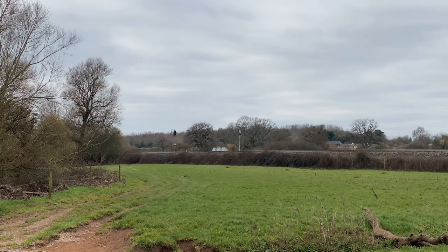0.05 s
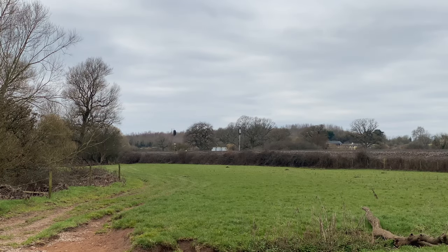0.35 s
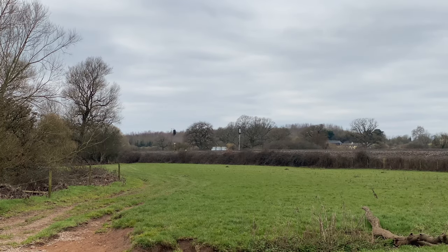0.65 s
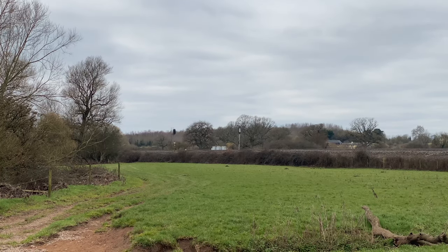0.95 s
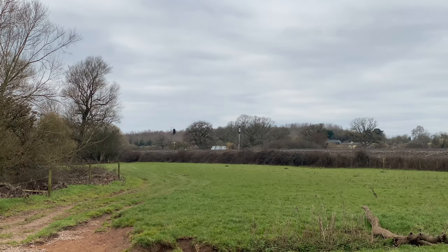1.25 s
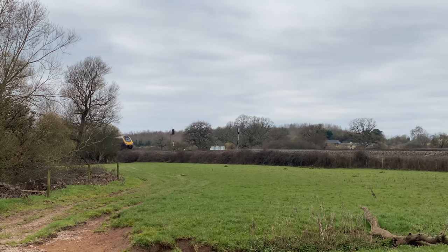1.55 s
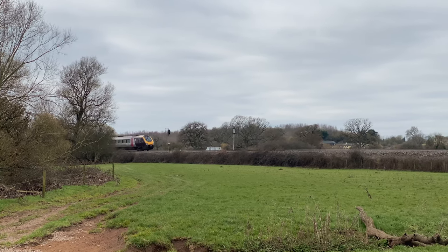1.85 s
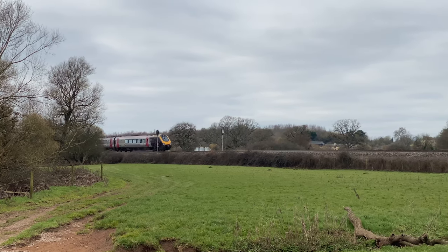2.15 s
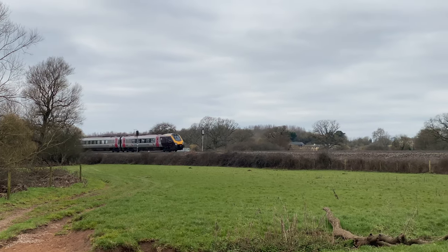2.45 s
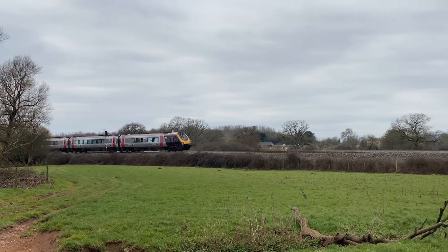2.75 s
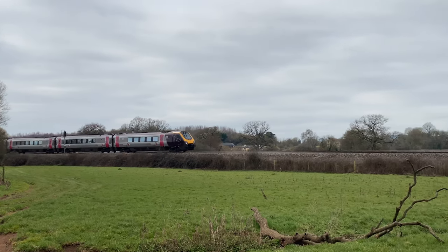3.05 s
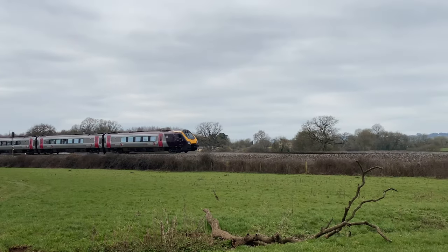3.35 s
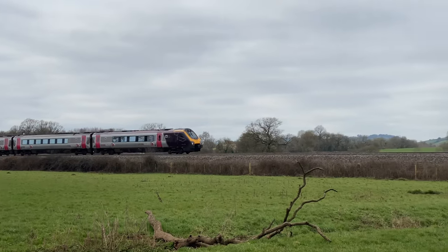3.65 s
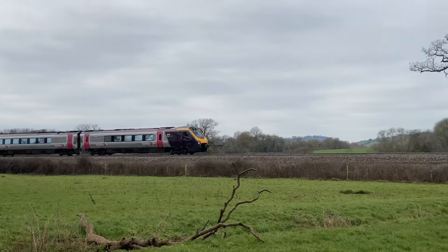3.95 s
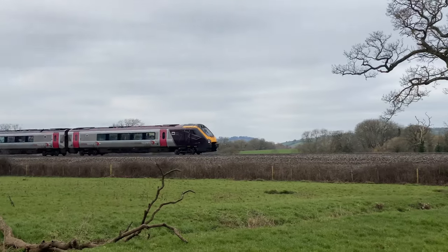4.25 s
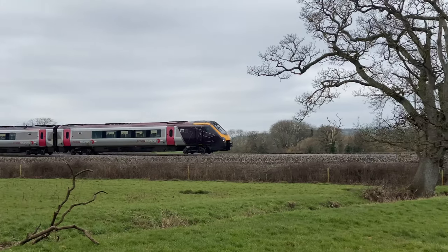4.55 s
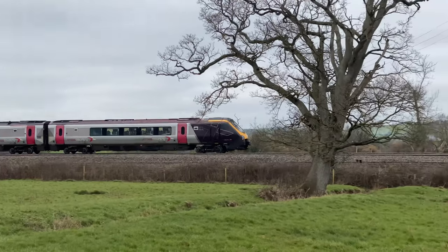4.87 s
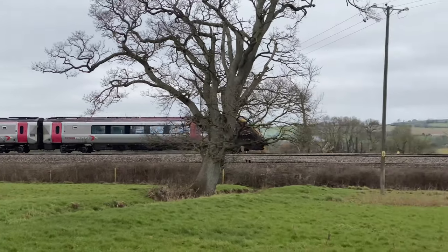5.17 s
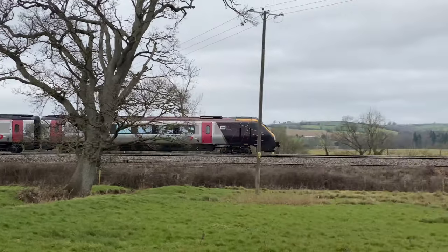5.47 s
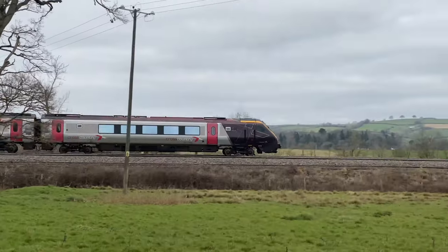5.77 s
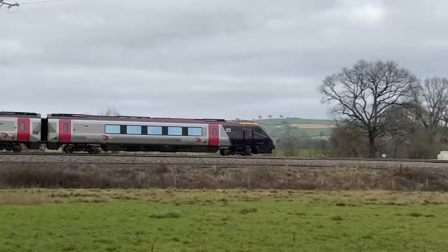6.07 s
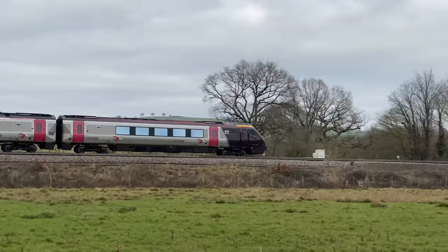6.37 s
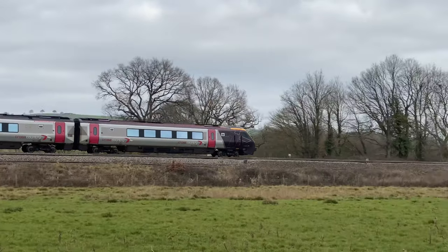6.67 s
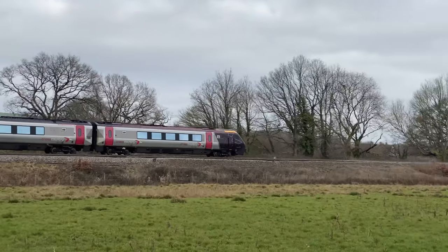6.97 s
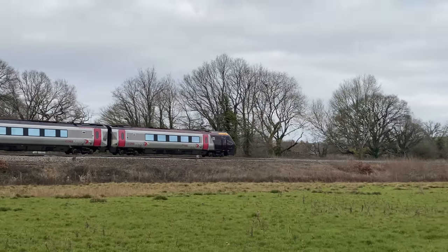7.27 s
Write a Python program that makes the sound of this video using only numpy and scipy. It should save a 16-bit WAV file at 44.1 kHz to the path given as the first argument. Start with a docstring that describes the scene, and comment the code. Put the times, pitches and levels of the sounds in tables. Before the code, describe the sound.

In an open field, a faint, distant track roar and light puffs of wind give way to a fast diesel train. Its low engine drone grows, then the cars rumble by with roaring, ringing rails, brief bright wheel scrapes and hiss that surges in an even beat. Thin whines sink in pitch as the cars pass. Wind buffets and thumps the microphone, hardest as the front of the train draws level.

```python
"""A fast diesel train comes out from behind trees and passes across a field.
Its exhausts drone, and rough wheels make the cars rumble and the rails roar, ring and hiss.
The hiss surges with each pair of bogies, and the running gear's whines sink in pitch as the cars go by.
Wind buffets, flaps and thumps on the microphone, hardest while the front of the train draws level."""
import sys
import numpy as np
from scipy import signal
from scipy.fft import rfft, irfft, next_fast_len
from scipy.io import wavfile
from scipy.ndimage import uniform_filter1d, map_coordinates

SR = 44100
rng = np.random.default_rng(int(sys.argv[2]) if len(sys.argv) > 2 else 0)


def transcribe(signal):
    """Save signal, clipped to [-1, 1], as a 16-bit WAV file at the path in sys.argv[1]."""
    frames = np.atleast_2d(signal).T
    limited = np.clip(frames, -1, 1)
    pcm = np.round(limited * 32767).astype(np.int16)
    wavfile.write(sys.argv[1], SR, pcm)


N = 327222


def amp(db):
    """Decibels to gain."""
    return 10 ** (np.asarray(db) / 20)


def unit(x):
    """Scale to rms 1."""
    return x / np.sqrt(np.mean(x ** 2) + 1e-20)


def clock():
    """The time of every sample, in seconds."""
    return np.arange(N) / SR


def along(points, hz):
    """Read (freq_hz, value) breakpoints on a log frequency axis."""
    freqs, values = np.transpose(points)
    return np.interp(np.log(hz + 1), np.log(freqs + 1), values)


def curves(rows):
    """One automation curve for each column after time_s."""
    times, *columns = np.transpose(rows)
    return [np.interp(clock(), times, column) for column in columns]


def swell(peak_s, spread_s):
    """A bell-shaped rise and fall around a moment."""
    return np.exp(-((clock() - peak_s) / spread_s) ** 2 / 2)


def bursts(rows):
    """The summed envelope of (peak_s, spread_s, level_db) swells."""
    return sum(amp(db) * swell(peak_s, spread_s) for peak_s, spread_s, db, *_ in rows)


def wobble(rate):
    """Smooth random modulation, rate knots a second."""
    knots = rng.standard_normal(4096)
    return map_coordinates(knots, [clock() * rate], mode="wrap")


def filtered(x, response):
    """Filter x by a complex frequency response."""
    size = next_fast_len(N + SR // 2)
    return irfft(rfft(x, size) * response(np.fft.rfftfreq(size, 1 / SR)), size)[..., :N]


def equalised(x, eq):
    """x through an EQ curve that rolls off steeply above its last point."""
    top_hz = eq[-1][0]
    return filtered(x, lambda hz: amp(along(eq, hz)) / np.maximum(hz / top_hz, 1) ** 10)


def rush(eq, side_db, patchy_db):
    """Shaped stereo noise of rms 1, with patches of random gain across time and frequency."""
    spectra = signal.stft(rng.standard_normal((2, N)), nperseg=512)[2]
    patches = uniform_filter1d(rng.standard_normal(spectra.shape[1:]), size=8, axis=0)
    patches = unit(uniform_filter1d(patches, size=10, axis=1))
    noise = signal.istft(spectra * amp(patchy_db * patches), nperseg=512)[1][:, :N]
    mid, side = equalised(noise, eq)
    return unit(np.array([mid + amp(side_db) * side, mid - amp(side_db) * side]))


def doppler(abreast_s, mach=.135, reach_s=1.25):
    """Pitch factor of a pass-by; reach_s is the track's distance over the speed."""
    past_s = clock() - abreast_s
    return 1 / (1 + mach * past_s / np.hypot(past_s, reach_s))


def phase_of(hz):
    """Running phase of a changing frequency."""
    return 2 * np.pi * np.cumsum(hz) / SR


def fuzzy(phase, rate):
    """A narrow noise band of rms 1 around a tone."""
    return unit(wobble(rate) * np.cos(phase) + wobble(rate) * np.sin(phase))


# gusts over the breeze: start_s, length_s, level_db
GUSTS = [(0.815, 0.043, -38), (1.12, 0.068, -33.5), (3.05, 0.12, -36), (3.423, 0.79, -37.5),
         (4.06, 0.23, -28), (4.4, 0.17, -19.5), (4.603, .34, -23.5), (4.956, 0.54, -22), (5.6, 0.35, -30),
         (5.942, 0.43, -27.5), (6.94, 0.56, -31.5)]
# boomy wind EQ: freq_hz, gain_db
BUFFET_EQ = [(18, -31.5), (30, -16.5), (45, -3.5), (60, 4), (85, 1), (130, -5.5), (200, -13.5),
             (300, -26.5), (600, -39.5), (1200, -55), (3000, -90.5)]


def wind_buffet(breeze_db=-39, attack_s=.026, release_s=.073):
    """Eddies rumble on the microphone: a bed of breeze, and gusts that rise, hold and die away."""
    power = amp(breeze_db) ** 2
    for start_s, length_s, db in GUSTS:
        age = clock() - start_s
        gust = np.clip(age / attack_s, 0, 1) * np.exp(-np.maximum(age - length_s, 0) / release_s)
        power += (amp(db) * gust) ** 2
    rumble = amp(1.6 * wobble(28)) * rush(BUFFET_EQ, side_db=-10, patchy_db=-.35)
    return np.sqrt(power) * unit(rumble)


# flaps of wind: peak_s, spread_s, level_db
FLAPS = [(.033, 0.0049, -54), (.108, 0.0046, -52), (.17, 0.0067, -48), (.303, .004, -52), (.362, .006, -52),
         (.58, 0.011, -44), (.985, 0.0048, -40), (1.13, 0.015, -43), (1.195, 0.0055, -38),
         (1.472, 0.0027, -40), (1.865, 0.0047, -43.5), (1.972, 0.0034, -36), (2.66, 0.0089, -41),
         (5.78, 0.0086, -22.5), (5.82, 0.033, -30), (5.873, 0.0054, -20.5), (5.925, 0.023, -29)]
# low-mid flap EQ: freq_hz, gain_db
FLAP_EQ = [(120, -21.5), (270, 0.5), (450, -4.5), (700, -10), (950, -25), (1400, -36), (2500, -63.5)]


def wind_flaps():
    """Small eddies flap on the microphone over a faint, restless flutter."""
    flutter = amp(-59) * unit(amp(7.5 * wobble(90)))
    return (bursts(FLAPS) + flutter) * rush(FLAP_EQ, side_db=-15.5, patchy_db=3)


# wind hits: start_s, strength_db
THUMPS = [(0.158, -28), (.465, -26), (0.827, -27), (1.149, -29), (1.19, -28), (1.968, -28.5), (3.58, -21),
          (4.257, -14), (4.409, -11), (4.52, -16.5), (4.943, -12), (5.152, -8), (5.264, -9.5), (5.444, -7),
          (7.318, -21)]
# dull puff EQ: freq_hz, gain_db
PUFF_EQ = [(20, -21), (50, -13), (90, -4.5), (180, 0.5), (280, -8.5), (500, -26), (900, -40.5), (2000, -60),
           (5000, -100)]


def wind_thumps(push_hz=95, puff_rise_s=.012):
    """A strong eddy hits with one low push of pressure, wrapped in a longer puff of noise."""
    pushes, puffs = np.zeros(N), np.zeros(N)
    for start_s, db in THUMPS:
        age = np.maximum(clock() - start_s, 0)
        pitch_hz = push_hz * np.exp(.25 * rng.standard_normal())
        pushes += amp(db) * swell(start_s + .016, .007) * np.sin(2 * np.pi * pitch_hz * age)
        puffs += amp(db) * age / puff_rise_s * np.exp(1 - age / puff_rise_s)
    return amp(-3) * pushes + amp(-10) * puffs * rush(PUFF_EQ, side_db=-8, patchy_db=1.2)


# exhaust drone automation: time_s, firing_tone_db, overtones_db
DRONE = [(0, -53, -57), (1.3, -43, -53), (2.4, -33, -46), (3.25, -37, -35), (3.75, -34, -34),
         (4.3, -37, -34), (5.15, -23.5, -31.5), (5.7, -32.5, -34.5), (6.5, -40, -35), (6.85, -34.5, -29.5),
         (7.42, -37.5, -31.5)]
# throbs of the firing tone: peak_s, spread_s, level_db
THROBS = [(4.63, 0.075, -27), (7.08, 0.068, -29.5), (7.37, 0.049, -27)]
# balance of crankshaft orders 4 to 9: gain_db
ORDERS_DB = [-13, -5.5, -2, -5, -9.5, -11]


def engines(firing_hz=91):
    """Six-cylinder diesels: a firing tone, and rougher orders from uneven cylinders and several cars."""
    tone_db, overtones_db = curves(DRONE)
    phase = phase_of(firing_hz * doppler(6.95) * (1 + .003 * wobble(7)))
    tone = unit(np.sin(phase) + .35 * fuzzy(phase, rate=30))
    overtones = np.zeros(N)
    for order, db in enumerate(ORDERS_DB, start=4):
        order_phase = phase / 3 * order  # three firings a turn
        partial = np.sin(order_phase + rng.uniform(0, 2 * np.pi))
        overtones += amp(db) * (partial + .7 * fuzzy(order_phase, rate=16))
    return (amp(tone_db) + bursts(THROBS)) * tone + amp(overtones_db) * unit(overtones)


def far_track(tone_hz=4030, pulse_hz=4.5):
    """The far roar of the track, heard before the train is in sight, with a faint pulsing high tone."""
    eq = [(150, -27.5), (300, 0), (550, 5.5), (750, -.5), (1000, -7),
          (1500, -22), (1900, -21.5), (2600, -37), (3500, -44)]
    roar = amp(-57 + 6.7 * swell(2.56, 1)) * rush(eq, side_db=-4, patchy_db=3.5)
    pulse = np.cos(2 * np.pi * pulse_hz * (clock() - .03))
    tone = amp(-96 + 3 * pulse) * fuzzy(phase_of(np.full(N, tone_hz)), rate=45)
    return roar + tone


# rumble automation: time_s, level_db
RUMBLE = [(0, -67), (1.5, -64), (3.2, -38), (4.1, -32), (4.8, -33), (5.55, -26), (6.15, -34.5),
          (6.9, -32.5), (7.42, -35.5)]
# car body EQ: freq_hz, gain_db
CAR_EQ = [(50, -31.5), (110, -4.5), (160, 2.5), (220, -1), (300, -7.5), (400, -9.5), (600, -24.5),
          (1200, -73.5)]


def car_rumble():
    """Rough wheels shake the cars into a low, unsteady rumble."""
    level_db = curves(RUMBLE)[0] + 2 * wobble(25)
    return amp(level_db) * rush(CAR_EQ, side_db=-6, patchy_db=1.5)


# pass-by automation, before each layer's trim: time_s, roar_db, rail_db, hiss_db
PASS_BY = [(0, -70, -73, -98), (1.5, -67.5, -66.5, -90), (2.3, -61, -59.5, -73.5),
           (3.15, -54.5, -52.5, -63), (3.65, -40.5, -41.5, -50), (4.02, -38.5, -33.5, -42),
           (5.0, -35, -29, -38.5), (5.6, -32, -29.5, -40.5), (6.05, -32.5, -29.5, -38.5),
           (6.8, -31.5, -32, -38.5), (7.12, -32.5, -31, -40), (7.42, -32.5, -35.5, -40.5)]
# the top end opens as the train comes close: time_s, fizz_offset_db
FIZZ_OFFSET = [(3.0, -20.5), (3.9, -13), (4.7, -11), (5.35, -4.5)]
# EQs of the rolling layers, dark to bright: freq_hz, gain_db
ROAR_EQ = [(200, -36.5), (330, -8.5), (500, 2.5), (700, 4), (1000, 3), (1350, 3), (1600, -8.5),
           (2300, -34.5)]
RAIL_EQ = [(1000, -19.5), (1450, -5), (1850, 1), (2200, -2.5), (2550, -4.5), (3000, -20), (3800, -45.5)]
WHEEL_RING_EQ = [(1900, -24), (2550, -3), (2850, 2), (3150, 0.5), (3450, -4.5), (3900, -17.5), (4600, -41)]
HISS_EQ = [(2600, -31), (3500, 0), (4200, 3), (5000, -2), (6300, 0), (7200, -9), (8500, -37.5),
           (11000, -49)]
FIZZ_EQ = [(5500, -20), (7200, -4), (7900, 1.5), (9200, -1), (10500, -10), (12000, -19), (12600, -34)]


def wheels_on_rails():
    """Rough wheels ring and shake the sleepers and rails; the treble arrives once the trees are cleared."""
    roar_db, rail_db, hiss_db = curves(PASS_BY)
    hiss_db += hiss_surges()
    fizz_db = hiss_db + curves(FIZZ_OFFSET)[0]
    ring_db = rail_db + .34 * (hiss_db - rail_db)  # distance dims the wheels' ring less than their hiss
    flutter = wobble(22)  # the contact patches bite unevenly
    roar = amp(roar_db + 3.5 + .45 * wobble(16)) * rush(ROAR_EQ, side_db=-20.5, patchy_db=.5)
    rail = amp(rail_db + .35 * flutter) * rush(RAIL_EQ, side_db=-29, patchy_db=1.14)
    ring = amp(ring_db - 2 + .44 * flutter) * rush(WHEEL_RING_EQ, side_db=-23, patchy_db=1.5)
    hiss = amp(hiss_db + .81 * flutter) * rush(HISS_EQ, side_db=-20, patchy_db=1.7)
    fizz = amp(fizz_db + 3 + .99 * flutter) * rush(FIZZ_EQ, side_db=-10.5, patchy_db=1.3)
    return roar + rail + ring + hiss + fizz


# scrape accents: peak_s, spread_s, level_db, hiss_lift_db
SCRAPES = [(3.76, .018, -36, 3), (3.92, .04, -40.5, 1), (4.02, 0.019, -28.5, 2.5), (4.171, .019, -31, 2.5),
           (4.234, 0.013, -23.5, 3), (4.35, 0.022, -29, 7), (4.63, .023, -32, 1), (4.87, 0.033, -42, 2.5),
           (5.075, 0.013, -38, 3), (5.22, 0.02, -39, 1), (5.88, 0.036, -45, 4)]


def scrapes():
    """A wheel scrapes the rail with a short, bright ring."""
    eq = [(1900, -19.5), (2500, -6.5), (2850, -5.5), (3150, -2), (3400, -10.5), (3900, -41)]
    return bursts(SCRAPES) * rush(eq, side_db=-17.5, patchy_db=3.5)


# accent of each pair of bogies in turn: hiss_lift_db
BOGIE_LIFTS = [3.5, 3.2, 4.9, .5, 4.1, 2.1, 4.2, 3.9]


def hiss_surges(first_bogie_s=4.235, car_s=.395, bogie_spread_s=.028):
    """Lift of the hiss in dB: at every scrape, and on an even beat as the bogies at the car ends pass."""
    scraping = sum(db * swell(peak_s, spread_s) for peak_s, spread_s, _, db in SCRAPES)
    bogies = sum(db * swell(first_bogie_s + car * car_s, bogie_spread_s)
                 for car, db in enumerate(BOGIE_LIFTS))
    return scraping + bogies


# running gear whines: rest_pitch_hz, abreast_s, peak_s, spread_s, level_db
WHINES = [(1820, 7.7, 5.14, 0.76, -40), (1857, 6.66, 6.15, 0.36, -32.5), (1850, 6.88, 7.05, 0.2, -34),
          (756, 6.4, 4.7, 0.68, -42), (755, 6.4, 5.84, 0.33, -32.5), (762, 6.5, 6.65, 0.28, -33.5),
          (795, 7.2, 7.3, 0.21, -37), (1147, 6.4, 5.74, 0.3, -38), (1157, 6.8, 6.78, .35, -37.5)]


def gear_whines(sizzle_hz=7800):
    """Each whine swells as its car comes near and sinks in pitch; a thin steel sizzle rides on top."""
    whines = np.zeros(N)
    for rest_pitch_hz, abreast_s, peak_s, spread_s, db in WHINES:
        pitch_hz = rest_pitch_hz * doppler(abreast_s)
        phase = phase_of(pitch_hz * (1 + .001 * wobble(40)))
        roughness = np.interp(pitch_hz, [1300, 1700], [1.3, .3])  # low whines are noisy, high ones sing
        whine = unit(np.sin(phase) + roughness * fuzzy(phase, rate=70))
        whines += amp(db) * swell(peak_s, spread_s) * whine
    sizzle = fuzzy(phase_of(sizzle_hz * doppler(6.7, mach=.04)), rate=300)
    return whines + amp(-49) * swell(6.9, .92) * sizzle


# phase lead of the left microphone port over the right: freq_hz, lead_rad
LEFT_LEAD = [(400, 0.24), (860, 0.82), (1350, 0.62), (1700, 0), (2600, 0), (3100, 0.72), (4950, 0.66),
             (6000, -0.85), (6500, 0.054), (7750, 0.58), (8100, 1.8), (9000, 1.8), (10000, 1.63),
             (10500, -0.16)]


def stereo_image(train):
    """The train reaches the two ports out of step, and its midrange leans left as the cars go by."""
    sides = np.array([[1], [-1]])
    train = filtered(train, lambda hz: np.exp(.5j * sides * along(LEFT_LEAD, hz)))
    mids = equalised(train, [(200, -17), (650, -1), (1150, 1), (1700, 1), (2600, -32)])
    lean = np.interp(clock(), [5.2, 6.2], [0, .15])
    return train + sides * lean * mids


def scene():
    """The mix: wind on the microphone over the approach and pass-by of the train."""
    low_wind = wind_buffet() + wind_thumps()
    width = np.interp(clock(), [2.2, 3.6], [0, 1])  # stronger wind strikes the two ports less alike
    wind = width * low_wind + (1 - width) * low_wind.mean(axis=0) + wind_flaps()
    rolling = car_rumble() + wheels_on_rails() + scrapes() + gear_whines()
    return wind + engines() + far_track() + stereo_image(rolling)


# microphone noise floor EQ: freq_hz, gain_db
SELF_NOISE_EQ = [(2650, -12.5), (4500, -4), (7900, -2.5), (12000, -9)]
SELF_NOISE_DB, TOP_HZ = -91.5, 12450


def record(dry):
    """The microphone adds a faint hiss; a brick-wall low-pass cuts the very top."""
    hiss = amp(SELF_NOISE_DB) * rush(SELF_NOISE_EQ, side_db=-3.5, patchy_db=.5)
    return filtered(dry + hiss, lambda hz: hz < TOP_HZ)


dry = scene()
out = record(dry)
transcribe(out)
```